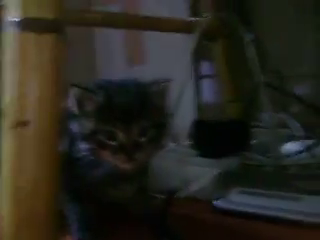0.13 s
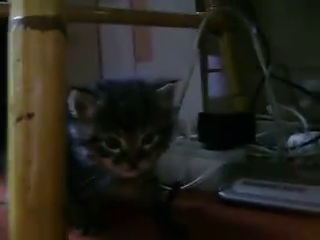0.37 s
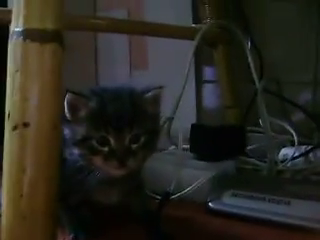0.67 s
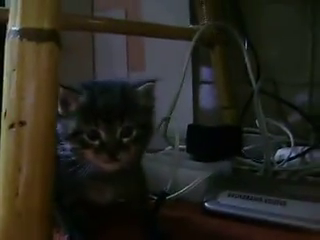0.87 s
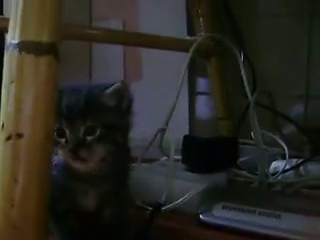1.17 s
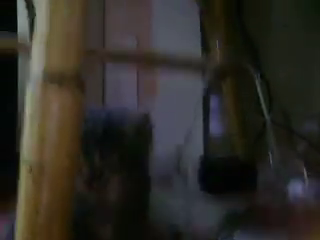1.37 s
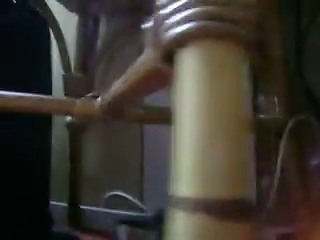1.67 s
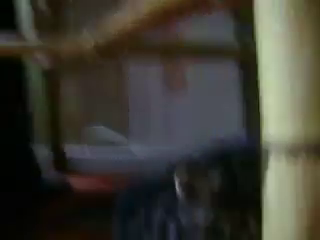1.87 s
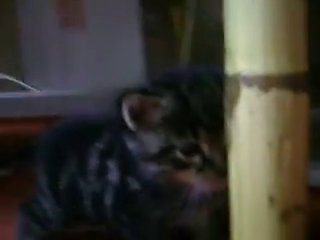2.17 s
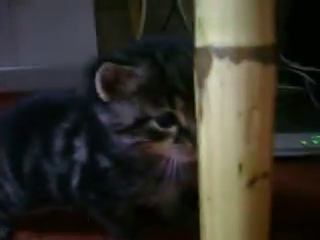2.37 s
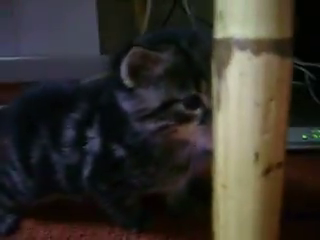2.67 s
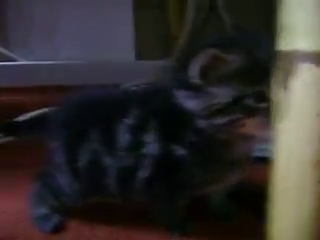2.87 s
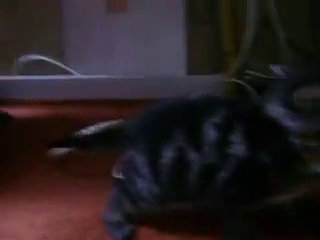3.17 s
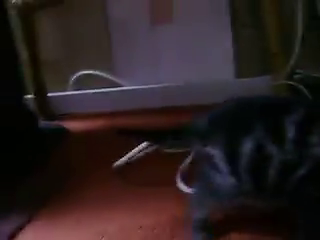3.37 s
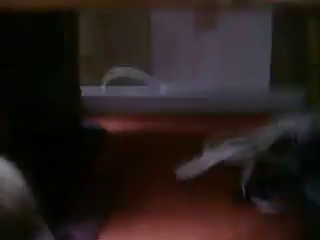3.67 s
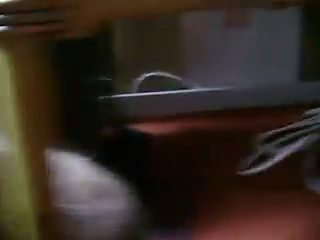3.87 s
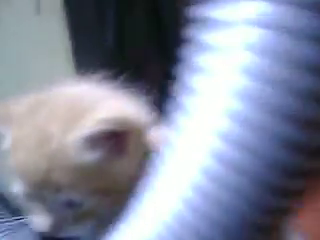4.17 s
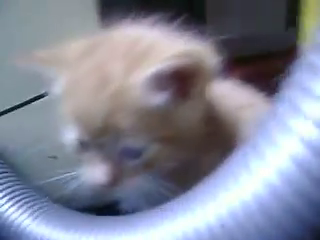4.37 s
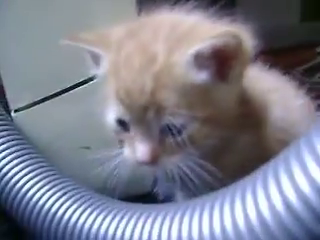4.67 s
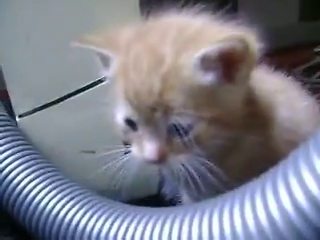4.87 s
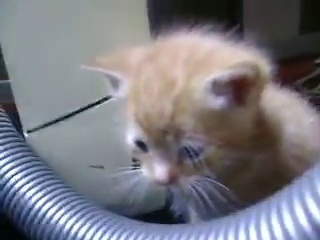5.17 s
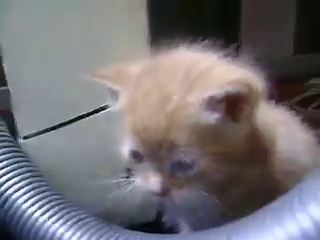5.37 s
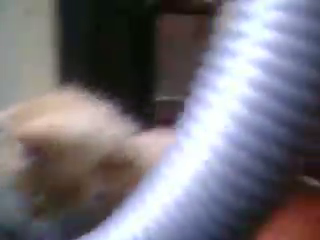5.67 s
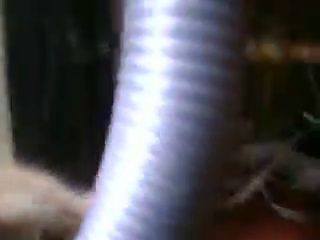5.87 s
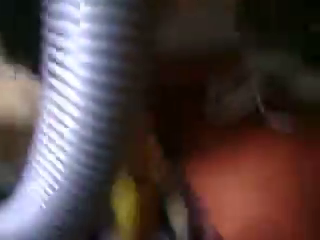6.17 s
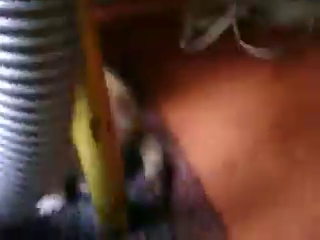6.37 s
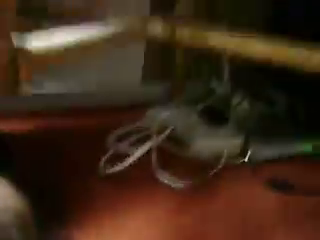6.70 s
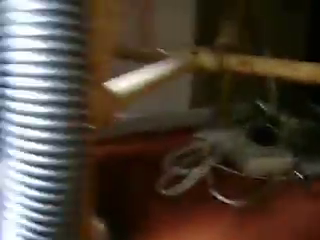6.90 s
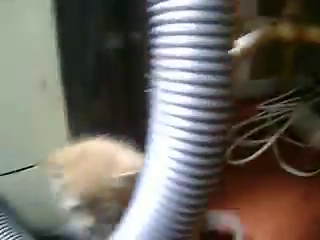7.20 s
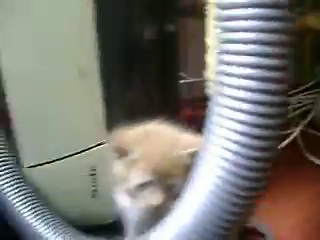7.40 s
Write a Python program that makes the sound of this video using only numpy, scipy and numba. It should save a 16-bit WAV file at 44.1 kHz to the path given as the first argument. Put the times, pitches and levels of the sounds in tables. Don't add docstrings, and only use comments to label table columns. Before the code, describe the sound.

A small, muffled camera microphone picks up a steady fan and disc hum in a dry room. Grainy cable scrapes open the scene, followed by hollow paw taps, claw clicks and soft fur brushes. A hard plastic crack stands out midway; the hum then drops back. Faint creaking leads into the densest scuffling and knocking, with dull thuds through the camera body.

```python
import sys
import numpy as np
from scipy import signal
from scipy.fft import rfft, irfft
from scipy.io import wavfile
from scipy.ndimage import uniform_filter1d
from numba import njit

SR = 44100
rng = np.random.default_rng(int(sys.argv[2]) if len(sys.argv) > 2 else 0)


def put_to_file(sound):
    columns = np.atleast_2d(sound).T
    safe = np.clip(columns, -1, 1)
    whole_steps = np.round(safe * 32767)
    wavfile.write(sys.argv[1], SR, whole_steps.astype(np.int16))


def invert_db(level):
    return 10 ** (np.asarray(level, dtype=float) / 20)


N = 332514

# time in seconds, level in dB.
FAN_LEVEL = [(0.0, -53), (0.46, -53.5), (1.6, -52), (1.97, -49.5), (2.77, -48), (3.32, -47.5), (3.91, -49),
             (4.26, -58), (5.19, -60.5), (6.4, -54), (6.53, -52.5), (7.03, -57), (7.43, -59.5),
             (7.54, -66.5)]
# time in seconds, level in dB.
DISC_LEVEL = [(0.0, -60.5), (0.92, -59), (3.4, -68), (4.32, -61), (5.86, -61), (5.98, -64), (7.43, -61)]
BUZZ_HZ = [199.5, 398.5, 487, 588, 694, 735, 915, 1459, 5000]
# width in Hz, level in dB when near, level in dB when turned away.
BUZZ_LINES = [(5, -62, -75), (5.7, -67, -68), (3, -66.5, -74), (5.5, -65, -72), (5, -69, -71.5),
              (5, -66.5, -72.5), (8.59, -72, -72.5), (6, -80.5, -101), (27, -75, -73.5)]
# frequency in Hz, density in dB per Hz.
RUSH_SPECTRUM = [(20, -8.5), (90, -5), (170, -2), (300, -3), (700, -5.5), (1000, -4.5), (1400, -12),
                 (2500, -15.5)]
# frequency in Hz, density in dB per Hz.
HISS_SPECTRUM = [(100, -9), (800, -2.5), (1600, 1.5), (3000, 0.5), (5000, -7), (8000, -4)]
# start in seconds, length in seconds, level in dB, rasp in Hz, hollow under it in dB.
DRAGS = [(0.105, 0.035, -39, 2240, -10.5), (.144, 0.056, -36, 2020, -10), (0.181, 0.053, -31.5, 1860, -15),
         (0.235, 0.012, -45, 2220, 1), (0.338, 0.033, -51, 1880, -19), (1.373, .03, -45, 1840, -10),
         (3.114, 0.02, -41.5, 2150, -4), (3.775, 0.044, -47.5, 2060, -9), (5.881, 0.037, -47, 2280, -4),
         (5.936, 0.037, -35, 2390, -14), (6.03, 0.027, -34.5, 1500, -10), (6.051, 0.025, -44, 1900, -12),
         (6.144, 0.014, -38.5, 1970, -6), (6.356, .07, -43.5, 2080, -4.5), (6.713, 0.055, -44, 2120, -14.5),
         (6.794, .08, -46, 1920, -3.5), (7.175, 0.02, -47.5, 2030, -6), (6.346, 0.016, -46, 2000, -3)]
# start in seconds, length in seconds, level in dB, hollow in Hz, rasp under it in dB.
SCUFFS = [(.24, .06, -63, 900, -13), (1.403, 0.053, -41, 1270, -2.5), (1.434, .045, -37.5, 1046, -6),
          (1.463, 0.063, -43.5, 1060, -6), (1.519, 0.064, -45.5, 815, -6), (1.566, 0.05, -45, 751, -13),
          (3.14, 0.018, -40, 687, -20), (3.165, 0.13, -50.5, 854, -8), (3.603, 0.082, -42.5, 732, -4.5),
          (5.918, 0.032, -42, 668, -1.5), (6.124, 0.021, -32, 885, -11), (6.161, .06, -60, 900, 5),
          (6.42, 0.081, -47.5, 770, -3), (6.473, 0.12, -40, 676, -4), (6.568, .045, -45.5, 750, -4.5),
          (6.602, 0.046, -42, 1010, -3.5), (6.836, 0.047, -50, 1030, -10.5), (7.232, .05, -52, 806, -12),
          (6.64, 0.11, -54, 740, 1)]
# start in seconds, length in seconds, level in dB, hollow under it in dB.
BRUSHES = [(1.831, .035, -54.5, -0.5), (3.252, .07, -54.5, 0), (3.596, .075, -47, -16),
           (3.706, 0.041, -41.5, -3), (3.971, 0.069, -48, -16), (4.007, .055, -49, -14),
           (4.177, .11, -51, -7), (5.386, 0.25, -61.5, -5.5), (5.95, .05, -48, -8), (6.023, 0.05, -46, -17),
           (6.296, .03, -52, -5), (7.059, 0.025, -59, 4)]
# start in seconds, peak in dB, frequency in Hz.
BUMPS = [(.17, -51, 60), (1.536, -56, 60), (3.952, -48, 69.4), (4.016, -50, 60), (5.9, -50, 45),
         (6.01, -49, 60), (6.4, -51, 45.5), (6.95, -61, 40), (6.129, -52, 70), (6.301, -43.5, 68),
         (6.775, -52, 60)]
# start in seconds, ring peak in dB, ring in Hz, edge over the ring in dB.
PAWS = [(0.98, -50, 890, 4), (1.426, -28, 1350, -7), (1.454, -27, 1090, -16), (1.498, -31.5, 1030, -8),
        (1.523, -35, 910, -1.5), (3.107, -35, 1020, -6), (3.36, -33.5, 1070, -5.5),
        (3.367, -16, 1010, -6.5), (4.142, -47.5, 595, 1), (4.525, -40, 886, -6.5), (5.901, -24, 705, -10),
        (6.039, -30, 1340, -10), (6.128, -13, 1046, -6.5), (6.358, -19.5, 1028, 1.5),
        (6.46, -37.5, 566, 5.5), (6.74, -36.5, 1010, -7), (6.785, -27, 1020, -7), (6.828, -33, 1070, -1.5),
        (6.885, -43, 1090, 1.5), (7.07, -35.5, 1120, -7.5), (7.089, -42.5, 1060, -4),
        (7.146, -36, 1173, -9), (7.178, -44, 1060, -8)]
# start in seconds, ring peak in dB, ring in Hz, edge over the ring in dB.
PADS = [
    (0.276, -45.5, 950, 6),
    (0.303, -51, 697, 7),
    (3.135, -24, 1066, -3.5),
    (5.884, -45.5, 1103, 1),
    (6.099, -48, 974, 2),
    (6.158, -21, 993, 1),
    (6.777, -24, 1033, -6.5),
    (7.246, -44, 614, -5),
]
# start in seconds, ring peak in dB, ring in Hz, edge over the ring in dB.
CLAWS = [
    (0.345, -55, 1100, 10),
    (3.113, -31, 745, 4.5),
    (3.633, -40.5, 730, 6),
    (3.686, -38, 970, -8),
    (5.927, -25.5, 746, 8),
    (6.77, -23, 1061, -15),
]
# start in seconds, ring peak in dB, ring in Hz,
# edge over the ring in dB.
PRESSES = [
    (1.538, -37, 750, 13.5),
    (1.848, -40, 1090, -0.5),
    (3.778, -33, 925, 5.5),
    (4.015, -31.5, 795, 7.5),
    (4.168, -52, 556, 10.5),
    (6.01, -22.5, 801, -14.5),
    (6.299, -38, 565, -3),
    (7.19, -47, 595, 6.5),
]
# knock in the edge in dB, tick in the edge in dB, ring t60 in seconds, knock decay as a factor.
PAW_KIND = (-0.5, -1.5, 0.0144, 1.05)
PAD_KIND = (-0.2, -7, .032, 1.2)
CLAW_KIND = (-12.5, -0.4, 0.09, .9)
PRESS_KIND = (1, -7.5, 0.02, 0.6)
# frequency in Hz, level in dB, t60 in seconds.
KNOCK_MODES = [(1550, -2, 0.0026), (2030, -2.5, 0.0057), (2600, -7, 0.0026)]
# frequency in Hz, level in dB, t60 in seconds.
TICK_MODES = [(2800, 0.5, 0.0024), (3860, -3.5, 0.0031), (3895, -2, 0.0038), (5040, -3.5, 0.0029),
              (5840, -4, 0.002)]
# frequency in Hz, level in dB, t60 in seconds.
CLAW_TICK_MODES = [(2850, -5, 0.0025), (3640, -1.5, 0.0041), (4140, -3, 0.0024), (5170, -5.5, 0.0035)]
# frequency in Hz, level in dB, t60 in seconds.
SNAP_MODES = [(354, -19.5, 0.011), (770, -16, 0.026), (950, -5, 0.014), (1277, -7, 0.0099),
              (2200, -11, 0.0053), (2990, 1.5, 0.0065), (3410, 2.5, 0.00535), (3860, 0.5, 0.0058),
              (4830, -7, 0.0072)]
# start in seconds, peak in dB, frequency in Hz.
CREAK_SLIPS = [(4.851, -37.5, 860), (4.863, -48, 900), (4.874, -42, 770), (4.894, -44, 821),
               (4.913, -45, 883), (4.929, -43, 837), (4.942, -46, 755), (4.955, -49, 860),
               (4.968, -45.5, 750), (4.977, -53, 600), (4.988, -48, 840), (5.014, -56, 890),
               (5.125, -45, 846), (5.142, -45, 860), (5.158, -47, 865), (5.275, -46, 685),
               (5.298, -46, 860)]


def level(x, db):
    return x * invert_db(db) / np.sqrt(np.mean(x ** 2))


@njit
def svf(x, hz, width):
    y, b, l = np.empty(len(x)), 0., 0.
    for i in range(len(x)):
        g = np.tan(np.pi * hz[i] / SR)
        k = width / hz[i]
        v = (b + g * (x[i] - l)) / (1 + g * (g + k))
        b, l, y[i] = 2 * v - b, l + 2 * g * v, k * v
    return y


def band(x, hz, width_hz):
    return svf(x, hz + np.zeros(len(x)), float(width_hz))


def walk(rate):
    hold = int(SR / rate)
    steps = np.repeat(rng.standard_normal(N // hold + 1), hold)
    smooth = uniform_filter1d(uniform_filter1d(steps, hold), hold)
    return level(smooth[:N], 0)


def coloured(spectrum):
    hz, db = np.transpose(spectrum)
    bins_hz = np.fft.rfftfreq(N, 1 / SR)
    gain = invert_db(np.interp(np.log(bins_hz + 1), np.log(hz), db))
    return level(irfft(rfft(rng.standard_normal(N)) * gain, N), 0)


def curve(table):
    s, db = np.transpose(table)
    return np.interp(np.arange(N) / SR, s, db)


def tone(hz, db, waver_hz):
    strength = np.sqrt(2) * invert_db(db + 0.49 * walk(11))
    phase = 2 * np.pi * np.cumsum(hz + waver_hz * walk(14)) / SR
    return strength * np.sin(phase)


def buzz():
    out = np.zeros(N)
    turn_s, turning_s = 4, 0.4
    away = np.clip((np.arange(N) / SR - turn_s) / turning_s, 0, 1)
    for hz, (width_hz, near_db, away_db) in zip(BUZZ_HZ, BUZZ_LINES):
        line = level(band(rng.standard_normal(N), hz, width_hz), 0)
        out += invert_db(near_db + away * (away_db - near_db)) * line
    return out


def computer():
    blade_db = curve(FAN_LEVEL)
    tones = tone(243.3, blade_db, waver_hz=0.3) + tone(120.4, curve(DISC_LEVEL), waver_hz=.3)
    panels = buzz()
    rush_db = -51.5 + 0.1 * (blade_db - blade_db.mean()) + 0.22 * walk(9.7)
    return tones + panels + invert_db(rush_db) * coloured(RUSH_SPECTRUM)


def hiss():
    return invert_db(-56) * coloured(HISS_SPECTRUM)


def stroke_rows():
    rows = [(s, n, 0.45, db, (hollow_db, 0, -13.5), 900, hz) for s, n, db, hz, hollow_db in DRAGS]
    rows += [(s, n, 0.4, db, (0, rasp_db, -17), hz, 2000) for s, n, db, hz, rasp_db in SCUFFS]
    rows += [(s, n, .55, db, (hollow_db, 0.5, 0), 900, 2080) for s, n, db, hollow_db in BRUSHES]
    return rows


def strokes():
    ends_db, blunt = -9.5, 1.62
    power = np.full((3, N), 1e-12)
    pull = np.full((2, N), 1500e-12)
    for s, length, rise, db, shares_db, *hz in stroke_rows():
        i = np.arange(int(s * SR), int((s + length) * SR))
        peak_s = np.clip(rise, .1, .9) * length
        shape_db = ends_db * np.interp(i / SR - s, [0, peak_s, length], [1, 0, 1]) ** blunt
        fade = np.clip(np.minimum(i - i[0], i[-1] - i) / (0.0012 * SR), 0, 1)
        p = (fade * invert_db(db + shape_db + np.array(shares_db)[:, None])) ** 2
        power[:, i] += p
        pull[:, i] += p[:2] * np.array(hz)[:, None]
    hollow_hz, rasp_hz = pull / power[:2]
    slips = invert_db(1.5 * walk(200) + 0.74 * walk(900)) * rng.standard_normal(N)
    hollow = band(band(slips, hollow_hz, 260), hollow_hz, 260)
    hollow += 0.71 * band(band(slips, 800, 1100), 890, 1200)
    rasp = band(slips, rasp_hz * (1 + 0.049 * walk(30)), 350) + 0.46 * band(slips, 1600, 1100)
    swish = band(band(slips, 3800, 3600), 3800, 3600)
    layers = (hollow, rasp, swish)
    return sum(gain * level(layer, 0) for gain, layer in zip(np.sqrt(power), layers))


def ring(modes, db, rise_s, rattle, scatter):
    t = np.arange(3072) / SR
    body = np.zeros(len(t))
    for k, (hz, mode_db, t60) in enumerate(modes):
        gain_luck, pitch_luck = rng.standard_normal(2)
        gain = (-1) ** k * invert_db(mode_db + 60 * scatter * gain_luck)
        decay = 1000. ** (-t / max(t60, .002))
        body += gain * np.sin(2 * np.pi * hz * (1 + scatter * pitch_luck) * t) * decay
    push = rattle * rng.standard_normal(300) * np.exp(-t[:300] / .002)
    push[0] = 1
    y = np.convolve(body * (1 - np.exp(-(t / rise_s) ** 2)), push)
    return y * invert_db(db) / np.abs(y).max()


def add(out, s, y):
    i = int(s * SR)
    out[i:i + len(y)] += y[:N - i]


def bumps():
    out = np.zeros(N)
    for s, db, hz in BUMPS:
        add(out, s, ring([(hz, 0, .09)], db, .004, 0, 0))
    return out


def tap(out, row, kind, tick_modes):
    s, ring_db, hz, edge_db = row
    knock_share_db, tick_share_db, t60, knock_decay = kind
    knock_db = ring_db + edge_db + knock_share_db
    tick_db = ring_db + edge_db + tick_share_db
    soft = np.clip((-25.5 - max(knock_db, tick_db)) / 11.0, 0, 1)
    slow = 1 + 0.94 * soft
    partner_hz = hz * 1.46 if hz < 860 else hz / 1.557
    hollow = [(hz, 0, t60), (partner_hz, -7, 0.45 * t60), (hz, -10, 0.24 * t60), (370, -13, .012)]
    knock = [(f, g, d * knock_decay) for f, g, d in KNOCK_MODES]
    add(out, s + 0.00054, ring(hollow, ring_db - 0.5, 0.00055 * slow, 0.039 + 0.2 * soft, scatter=0.023))
    add(out, s + 0.001, ring(knock, knock_db + 2.0, 0.00039 * slow, 0.035 + 0.81 * soft, scatter=.03))
    add(out, s + .0009, ring(tick_modes, tick_db + 5.5, 0.00029 * slow, 0.099 + 0.54 * soft, scatter=.03))


def taps():
    out = np.zeros(N)
    for table, kind, tick_modes in ((PAWS, PAW_KIND, TICK_MODES), (PADS, PAD_KIND, TICK_MODES),
                                    (CLAWS, CLAW_KIND, CLAW_TICK_MODES), (PRESSES, PRESS_KIND, TICK_MODES)):
        for row in table:
            tap(out, row, kind, tick_modes)
    return out


def snap():
    out = np.zeros(N)
    add(out, 3.9502, ring(SNAP_MODES, 1.1, 0.00031, 0, scatter=0))
    return out


def creak():
    out = np.zeros(N)
    for s, db, hz in CREAK_SLIPS:
        add(out, s + 0.0004, ring([(hz, 0, .014)], db + 2.5, 0.00076, .03, scatter=0))
    return out


def thin_bass(x):
    return signal.sosfilt(signal.butter(2, 150, "high", fs=SR, output="sos"), x)


def furniture(hits):
    t = np.arange(2048) / SR
    smear = level(band(rng.standard_normal(len(t)), 900, 1100) * 1000. ** (-t / .04), -52)
    return signal.fftconvolve(hits, smear)[:N]


def scene():
    hits = thin_bass(taps() + creak() + snap())
    near = hits + furniture(hits)
    return (near + bumps() + strokes() + computer() + hiss())[None]


def band_limit(x):
    return signal.sosfilt(signal.butter(12, 15800, fs=SR, output="sos"), x)


def record(dry):
    top_hz, full_scale = 5527, 0.76
    edge = signal.firwin(101, top_hz, window=("kaiser", 6), fs=SR)
    narrow = signal.fftconvolve(dry, edge[None], "same")
    return band_limit(np.clip(narrow, -full_scale, full_scale))


dry = scene()
out = record(dry)
put_to_file(out)
```